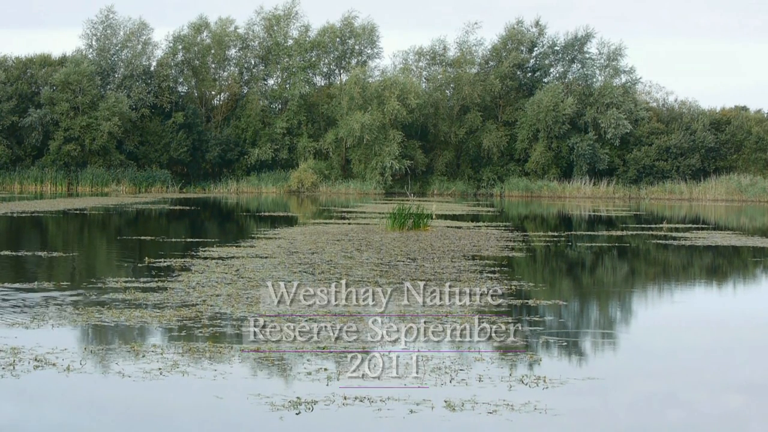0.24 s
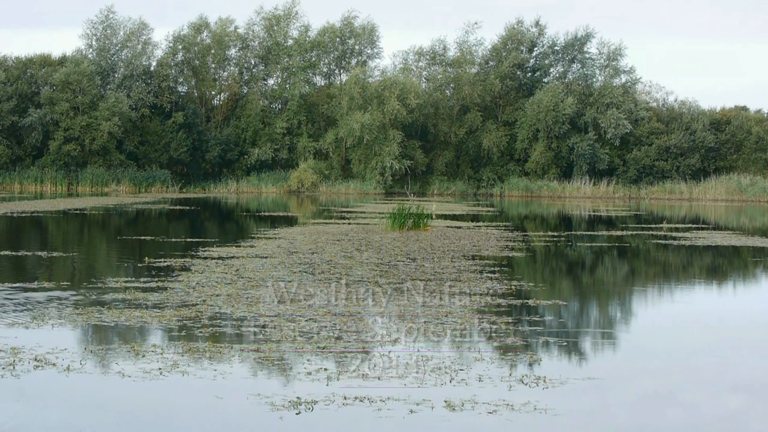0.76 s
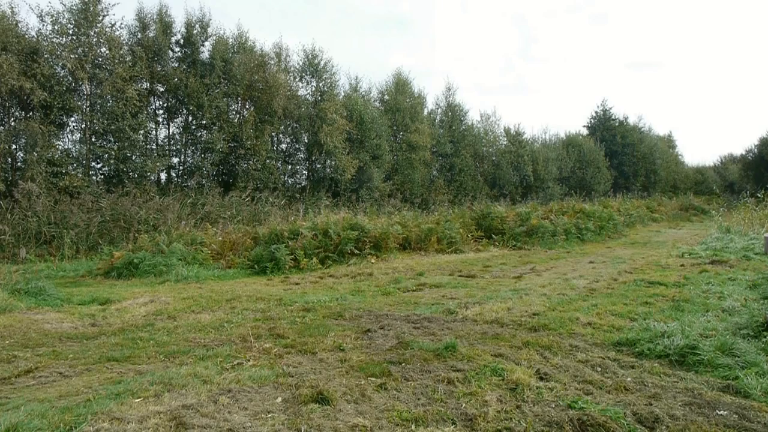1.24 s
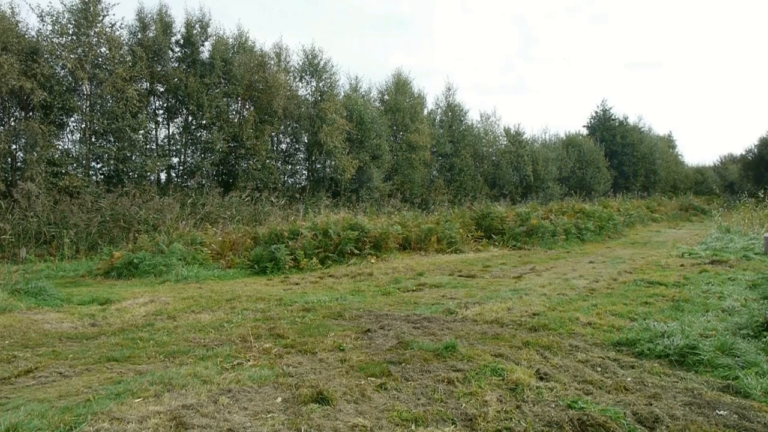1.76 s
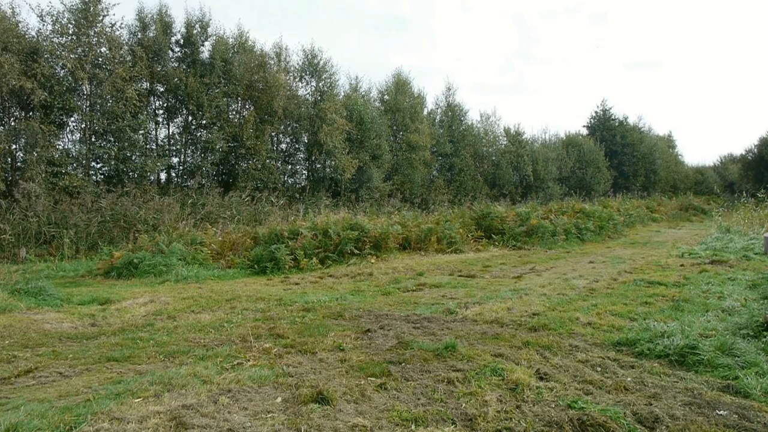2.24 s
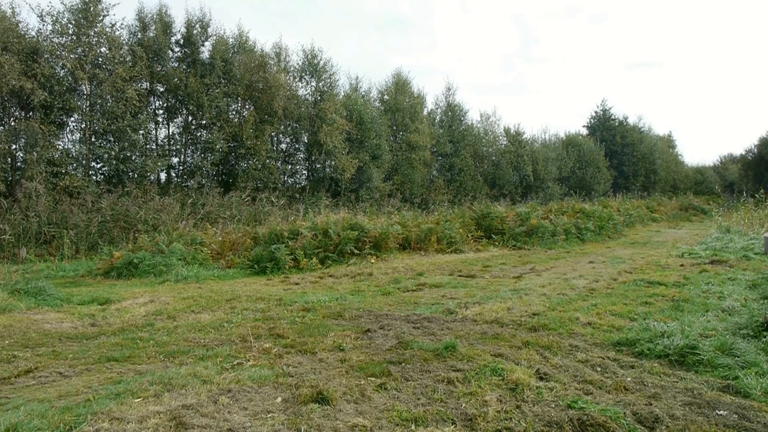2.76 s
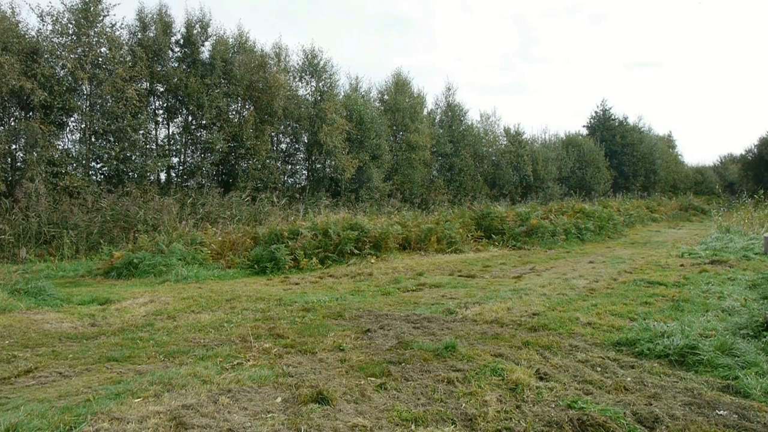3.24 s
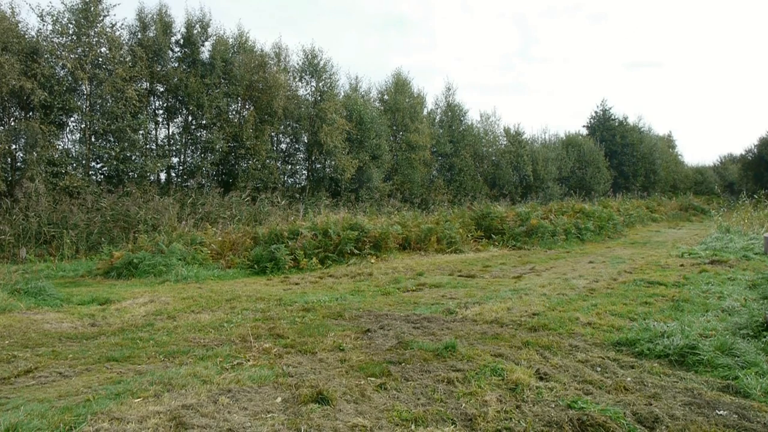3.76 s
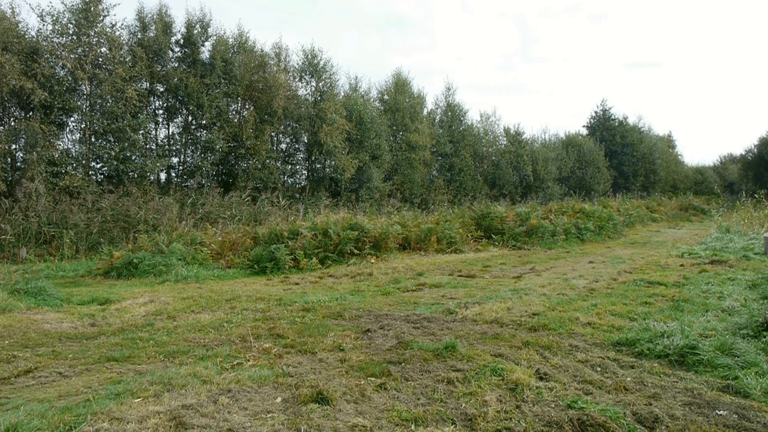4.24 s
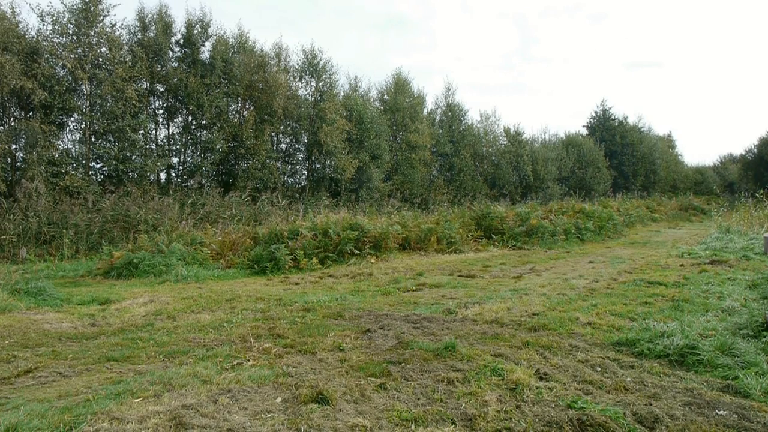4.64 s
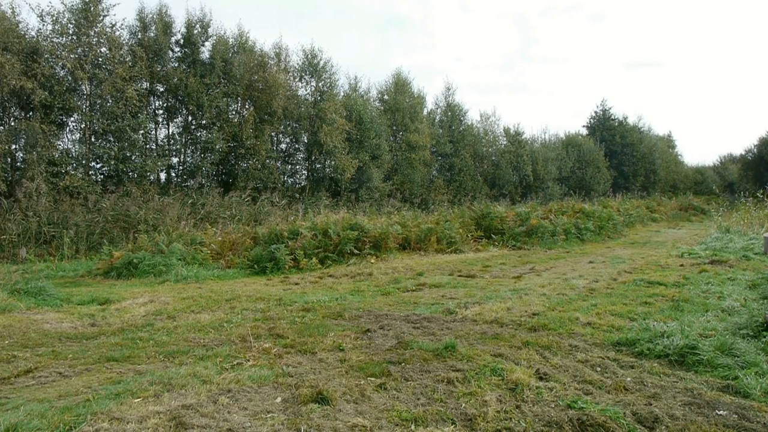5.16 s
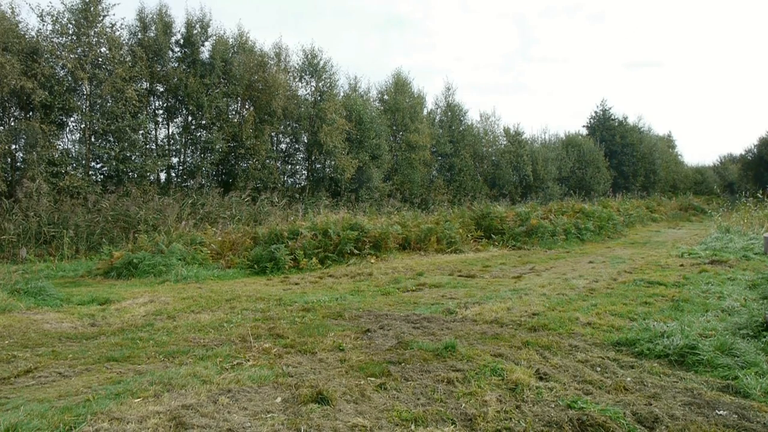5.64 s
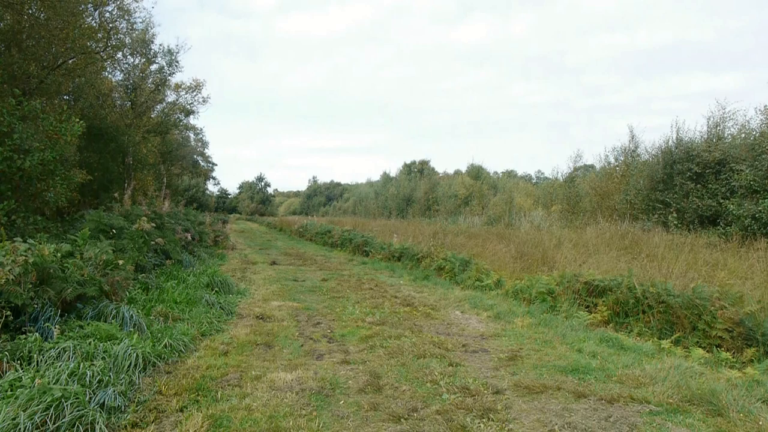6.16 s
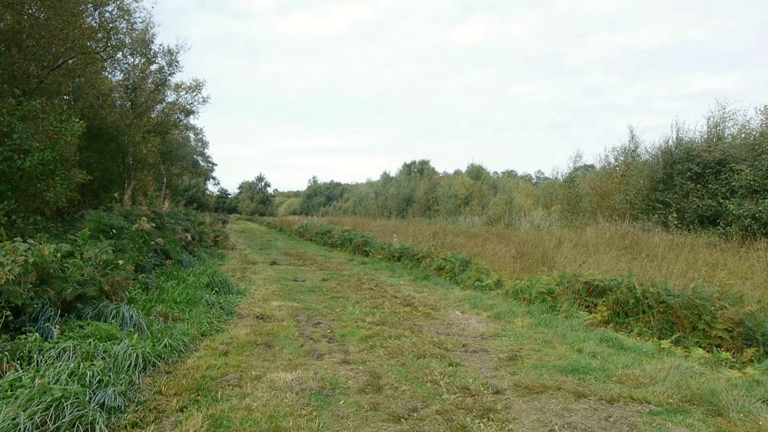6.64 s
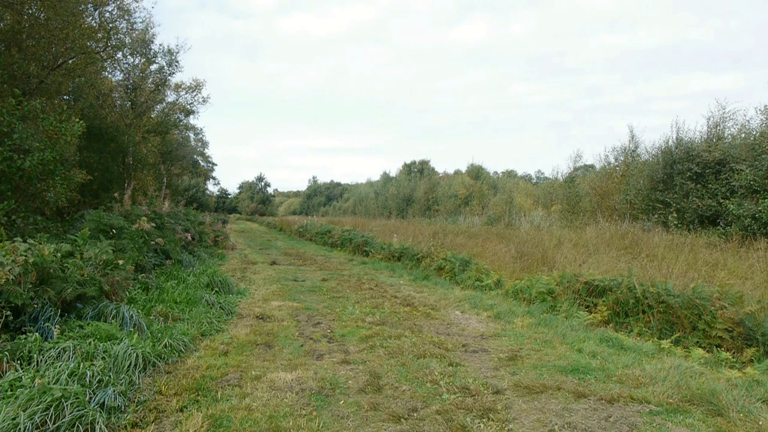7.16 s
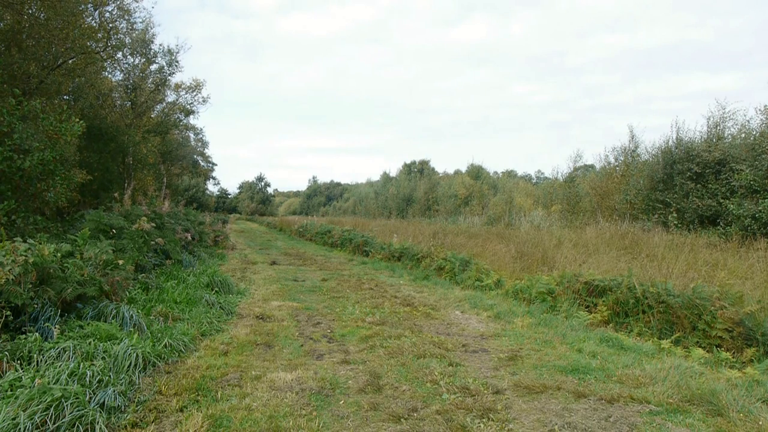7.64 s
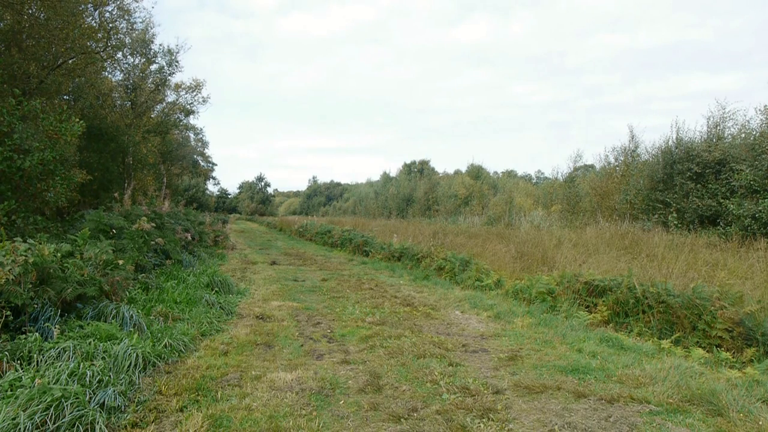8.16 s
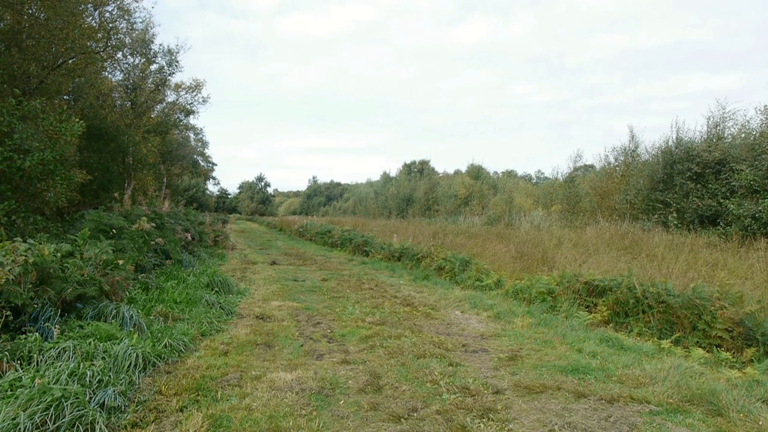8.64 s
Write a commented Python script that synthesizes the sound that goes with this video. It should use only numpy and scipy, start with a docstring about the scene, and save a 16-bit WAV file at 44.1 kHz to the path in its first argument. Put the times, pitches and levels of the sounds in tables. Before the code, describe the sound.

A clear fluty bird whistles close by while others trade scratchy chirps and nasal calls; quiet hiss beneath, distant motor throbbing at the end.

```python
"""At the edge of a wood beside a reed bed, small songbirds sing: one whistles and trills close by, others repeat
harsh chirps and nasal calls, and more sing from deep in the trees. Each voice is a phase-integrated tone with
overtones, following a pitch and level contour; decaying noise echoes stand for scattering by leaves and trunks.
Shaped noise makes a faint steady hiss of air; for the last three seconds low harmonics make a far engine hum."""
import sys
import numpy as np
from scipy import signal
from scipy.fft import rfft, irfft
from scipy.io import wavfile
from scipy.ndimage import uniform_filter1d, map_coordinates

SR = 44100
rng = np.random.default_rng(int(sys.argv[2]) if len(sys.argv) > 2 else 0)


def generate_wav(sig):
    """Save sig (samples, or channels by samples) to the path in sys.argv[1] as 16-bit PCM at SR."""
    pcm = np.round(np.clip(np.atleast_2d(sig).T, -1, 1) * 32767).astype(np.int16)
    wavfile.write(sys.argv[1], SR, pcm)


N = 392931
TIME = np.arange(N) / SR
FREQS = np.fft.rfftfreq(N, 1 / SR)


def undb(db):
    """Level to amplitude ratio: 20 dB is a factor of ten."""
    return 10 ** (np.asarray(db) / 20)


def over_pitch(points):
    """A spectrum through (f/Hz, value) points, interpolated on a logarithmic frequency axis."""
    hz, value = np.transpose(points)
    return np.interp(np.log(FREQS + 1), np.log(hz), value)


def walk(rate, size):
    """Band-limited random fluctuation: normal draws, `rate` per second, joined by a smooth spline."""
    at = np.arange(size) / SR * rate
    draws = rng.standard_normal(int(at[-1]) + 2)
    return map_coordinates(draws, [at], order=2, mode="nearest")


def air():
    """Broadband noise of far foliage; interaural correlation peaks near 300 Hz and is lowest in the treble."""
    # spectrum of the hiss: f/Hz, relative density/dB per Hz
    colour = [(30, -45), (60, -19.5), (92, -22), (144, -8), (200, -5.5), (300, -0.5), (900, -4), (1330, -8),
              (2100, -6), (3300, -8.5), (5200, -15), (9000, -17.5), (15500, -20)]
    # likeness of the two ears: f/Hz, correlation
    ear_likeness = [(100, 0.28), (300, 0.81), (700, 0.53), (2000, 0.37), (8000, .1)]
    mid_level_db = -56.5
    mid, side = rfft(rng.standard_normal((2, N))) * undb(over_pitch(colour))
    likeness = np.clip(over_pitch(ear_likeness), -.9, .99)
    # the ratio of side to mid energy sets the correlation
    side = side * np.sqrt((1 - likeness) / (1 + likeness))
    mid, side = irfft(mid, N), irfft(side, N)
    hiss = np.array([mid + side, mid - side]) / np.std(mid)
    return hiss * undb(mid_level_db + 0.19 * walk(0.64, N))


def engine():
    """Harmonic synthesis: only low multiples of the firing rate carry this far, throbbing and wavering."""
    # harmonics: multiple of the firing rate, level/dB before throb and waver
    harmonics = [(2, -89), (3, -72), (4, -67.5), (5, -63), (6, -67)]
    start_s, firing_hz = 5.81, 27.4
    phase = 2 * np.pi * np.cumsum(firing_hz * (1 + 0.0043 * walk(1.98, N))) / SR
    throb_db = 2.0 * np.cos(2 * np.pi * 1.08 * (TIME - start_s - .14))
    hum = np.zeros(N)
    for multiple, level_db in harmonics:
        waver_db = 1.5 * walk(2.7, N)
        hum += np.sqrt(2) * undb(level_db + throb_db + waver_db) * np.cos(multiple * phase)
    return hum * np.clip((TIME - start_s) / 0.0062, 0, 1)


def in_wood(x, pan_db, lead_ms, leaves_db, wood_db, leaves_t60=0.29, wood_t60=0.97):
    """Scattering: direct sound with level and time differences between ears, then diffuse decaying echoes.

    Positive pan_db and lead_ms favour the left; T60 values are in seconds."""
    t = TIME[:SR]
    sides = np.array([[.5], [-.5]])

    def decay(t60):
        # exponential decay with a brief build-up, scaled to unit energy
        course = np.exp(-np.log(1000) * t / t60) * (1 - np.exp(-t / 0.0023))
        return course / np.linalg.norm(course)

    # nearby leaves scatter briefly and keep the side; far trunks scatter for longer, from all round
    leaves = undb(leaves_db + sides * pan_db) * decay(leaves_t60)
    trunks = undb(wood_db) * decay(wood_t60)
    scatter = np.hypot(leaves, trunks) * rng.standard_normal((2, SR))
    echoes = signal.fftconvolve(x[None], scatter, axes=1)[:, :N]
    # windowed sinc filters delay by a fraction of a sample
    taps = np.arange(-16, 17)
    ports = np.sinc(taps + sides * lead_ms * SR / 1000) * np.hanning(len(taps))
    direct = np.array([np.convolve(x, port, "same") for port in ports])
    return direct * undb(sides * pan_db) + echoes


def sing(notes, overtone_db, rough, flutter_db, rasp_db, trills=()):
    """Frequency modulation in a syrinx: pitch is integrated to phase; uneven vibration adds roughness and rasp."""
    out = np.zeros(N)
    for note in notes:
        s, hz, db = np.transpose(note)
        span = np.flatnonzero((TIME > s.min()) & (TIME < s.max()))
        t, size = TIME[span], len(span)
        if size < 2:
            continue
        pitch = uniform_filter1d(np.interp(t, s, hz), size=200, mode="nearest")
        loud = np.interp(t, s, db) + flutter_db * walk(249, size)
        for start, stop, rate, depth_hz, saw, swing_db in trills:
            # loudness swings along with the pitch sweep; a negative swing opposes it
            turn = 2 * np.pi * rate * (t - start) + .25 * walk(45, size)
            # the trill fades in and out over a quarter of a sweep
            on = np.clip(np.minimum(t - start, stop - t) * rate * 4, 0, 1)
            pitch = pitch + on * depth_hz * (np.sin(turn) - saw * np.sin(2 * turn))
            loud = loud + on * swing_db * (np.sin(turn + 2 * saw) - .5)
        phase = 2 * np.pi * np.cumsum(pitch * (1 + rough * walk(894.0, size))) / SR
        tone = np.sin(phase)
        for k in range(2, 5):
            # harmonics fall 11.5 dB apiece; overtone_db lies midway between the second and third
            gain = undb(overtone_db - 11.5 * (k - 2.5))
            below_nyquist = k * pitch < SR / 2
            tone += gain * np.sin(k * phase) * below_nyquist
        # rasp: the octave, modulated by fast noise
        rasp = undb(rasp_db) * np.sin(2 * phase) * walk(11000, size)
        edges = np.clip(np.minimum(t - t[0], t[-1] - t) / 0.0013, 0, 1)
        out[span] += np.sqrt(2) * undb(loud) * edges * (tone + rasp)
    return out


def slurred(rows, attack_share, swell_db, slew_hz_per_s=14000):
    """Pitch glide with exponential relaxation: a note scoops onto a bowed glide, sags at its end and fades."""
    bow_hz_per_s2, release_share = 4100, 0.039
    bend_db_per_hz = .019  # loudness lost while the note is bent down
    along = np.linspace(0, 1, num=40)

    def bend_course(depth_hz, s):
        # the syrinx retunes at a limited speed, so a deeper bend takes longer
        return depth_hz * np.exp(-s * slew_hz_per_s / (abs(depth_hz) + 1))

    def note(start, length, from_hz, to_hz, level_db, scoop_hz=0, sag_hz=0):
        t = along * length
        bow = bow_hz_per_s2 * (t - length / 2) ** 2
        glide = from_hz + (to_hz - from_hz) * along - bow
        bend = bend_course(scoop_hz, t) + bend_course(sag_hz, length - t)
        envelope = (1 - np.exp(-along / attack_share)) * (1 - np.exp(-(1 - along) / release_share))
        fade_db = 20 * np.log10(np.maximum(envelope, .1))
        bend_loss_db = bend_db_per_hz * np.maximum(bend, 0)
        db = level_db + swell_db * (along - .5) - bend_loss_db + fade_db
        return np.column_stack([start + t, glide - bend, db])

    return [note(*row) for row in rows]


def tiny_bird():
    """Rapid pitch relaxation: two thin, high contact notes hook up from below."""
    # notes: t/s, length/s, glide from f/Hz, to f/Hz, level/dB, scoop/Hz, sag/Hz
    high_notes = [(4.768, .06, 6150, 5840, -48, 790, 0), (4.866, 0.053, 5660, 5680, -53, 395, 0)]
    contours = slurred(high_notes, attack_share=0.045, swell_db=-11, slew_hz_per_s=90000)
    notes = sing(contours, overtone_db=-36, rough=0.018, flutter_db=0.5, rasp_db=-35)
    return in_wood(notes, pan_db=5, lead_ms=0.013, leaves_db=-3, wood_db=-7)


def warbler():
    """Frequency sweeps: fast runs, rising slurs, and nasal calls arched in pitch, coloured by their overtones."""
    # sweeping runs: t/s, length/s, glide from f/Hz, to f/Hz, level/dB, scoop/Hz (negative = from above), sag/Hz
    run_notes = [(.202, .027, 3050, 4200, -33, 0, 0), (.24, .108, 3160, 2550, -32.5, -1050, 0),
                 (4.525, 0.179, 3034, 3070, -34, 8, 0.013)]
    # trilled stretches: from t/s, to t/s, sweep rate/Hz, depth/Hz, sawtooth share, loudness swing/dB
    run_trills = [(.212, .35, 48.4, 514, 0.023, 1.3), (4.525, 4.71, 50.3, 1124, -0.063, 8.8)]
    # rising slurs: t/s, length/s, glide from f/Hz, to f/Hz, level/dB
    slurs = [(.157, .075, 2380, 3710, -46.5), (3.486, .09, 2462, 3593, -65.5)]
    # arched nasal calls: t/s, length/s, top f/Hz, top level/dB, overtone level/dB
    arches = [(0, 0.098, 3584, -43.5, -17.5), (0.21, 0.037, 2990, -43.5, -18),
              (2.14, 0.082, 3330, -41.5, -21), (4.33, 0.044, 2816, -36.5, -13.5),
              (4.389, 0.039, 3413, -36.5, -31), (0.585, 0.041, 6340, -53.5, -35),
              (0.645, 0.016, 6000, -50.5, -30), (1.48, 0.025, 4720, -41.5, -26),
              (1.517, 0.029, 6530, -58, -30), (4.031, .022, 5930, -52.5, -21),
              (6.134, 0.072, 3200, -61, -30), (4.738, 0.033, 7930, -56.5, -30),
              (4.824, 0.034, 7800, -60, -30), (7.429, 0.032, 7770, -54, -28)]
    run_contours = slurred(run_notes, attack_share=.05, swell_db=-3, slew_hz_per_s=50000)
    runs = sing(run_contours, overtone_db=-30, rough=.015, flutter_db=1.5, rasp_db=-27, trills=run_trills)
    slur_contours = slurred(slurs, attack_share=0.075, swell_db=-9)
    calls = sing(slur_contours, overtone_db=-10.5, rough=0.0347, flutter_db=4, rasp_db=-14)
    along = np.linspace(-1, 1, num=9)
    for start, length, top_hz, level_db, overtone_db in arches:
        t = start + length * (along + 1) / 2
        arch = np.column_stack([t, top_hz * (1 - 0.33 * along ** 2), level_db - 9 * along ** 2])
        calls += sing([arch], overtone_db=overtone_db, rough=0.024, flutter_db=3.5, rasp_db=-25.5)
    return (in_wood(runs, pan_db=6, lead_ms=.055, leaves_db=-10, wood_db=-15)
            + in_wood(calls, pan_db=0.0, lead_ms=.007, leaves_db=-1.5, wood_db=-38))


def repeats(shape, calls):
    """Similarity: one call contour is shifted, transposed and stretched for each utterance."""
    return [[(start + s * length, hz * ratio, db + level_db) for s, hz, db in shape]
            for start, level_db, ratio, length, _ in calls]


def lower_side(shape):
    """Two-source voice: the other side of the syrinx sounds lower, softer and 4 ms later before stretching."""
    return [(s + .004, hz * .82, db - 13.5) for s, hz, db in shape]


def scratch(calls):
    """Modulated noise: a crackly hiss swells 50 ms ahead of each chirp, peaks at its start, fades in uneven spurts."""
    # course of the hiss: t/s from the chirp's start, relative level/dB
    scratch_course = [(-.05, -20.5), (-.025, -4), (.01, 2.5), (0.048, -4.5), (.085, -11), (.115, -23)]
    # spectrum of the hiss: f/Hz, relative density/dB per Hz
    scratch_colour = [(1500, -50.5), (2500, -13), (4300, 0), (5100, 5), (5700, -1), (7000, -3.5),
                      (9000, -12.5), (15500, -25)]
    s, db = np.transpose(scratch_course)
    course = np.zeros(N)
    for start, *_, scratch_db in calls:
        course += np.interp(TIME - start, s, undb(db + scratch_db), left=0, right=0)
    spurts_db = 4.5 * walk(1200, N) + 3.5 * walk(120, N)
    grains = rng.standard_normal(N) * undb(spurts_db)
    hiss = irfft(rfft(grains) * undb(over_pitch(scratch_colour)), N)
    return course * hiss / np.std(hiss)


def chirpers():
    """Two-source voices: birds in the bushes trade rough chirps, both sides of the syrinx sounding in the nearer."""
    # contours of the harsh chirp, its softer reply, and a faint, thin tone near 5 kHz that swells
    # for about 40 ms before each harsh chirp:
    # t/s from the start, f/Hz, relative level/dB, before each utterance's stretch, ratio and level
    chirp = [(0, 3190, -15.5), (.012, 4668, 6), (.018, 4924, 7), (.027, 3452, -1.5), (.035, 4447, 5.5),
             (.042, 3722, 1.5), (.058, 3900, 7), (.07, 3294, 3.5), (.085, 2600, -6.5)]
    reply = [(0, 3510, -5), (.013, 4350, 1), (.028, 4450, -3), (.042, 3684, 1.5), (.06, 3600, 3.5),
             (.074, 3213, -3.5), (.09, 2664, -12.5)]
    faint_tone = [(-.04, 5000, -25), (-.022, 4910, -15), (-.002, 4850, -15)]
    # utterances of harsh chirps, replies and chirps from deeper in the wood:
    # t/s, level/dB, pitch ratio, length ratio, scratch level/dB, before the mix gains below
    chirps = [(.449, -36.5, 0.99, 0.97, -44.5), (1.318, -38, 0.97, 1.11, -49),
              (2.513, -37.5, 0.97, 1.09, -48.5), (3.259, -37.5, 0.99, 1.07, -50),
              (3.869, -35, .98, 1.08, -47.5), (4.5, -35.5, 1, 1.01, -45), (5.227, -35, 1.005, 1.06, -45),
              (5.46, -50, .92, 1.06, -60), (6.329, -36, 1.02, 1.03, -43.5), (6.901, -37, 1.06, 1.01, -40),
              (7.186, -53, .85, 0.96, -63), (7.904, -40.5, .95, .9, -44)]
    replies = [(.298, -40, 1.01, 1.05, -58), (.48, -43, 0.9, 0.81, -58), (.943, -45, 1, 1.05, -60.5),
               (0.986, -53.5, 0.74, 0.61, -91), (1.44, -44, 0.9, 0.77, -66), (1.474, -45, .94, 0.91, -60.5),
               (2.63, -47, 0.86, 1.15, -93), (2.729, -44, 0.98, 1.17, -58),
               (3.102, -44, 1.013, 0.93, -59.5), (4.62, -46, 1.11, 0.87, -61),
               (4.665, -42.5, 0.97, 1.09, -63), (5.085, -43.5, 0.92, 1.05, -61),
               (6.388, -40.5, 0.94, 0.92, -56.5), (7.225, -52, 0.97, 0.63, -85),
               (7.962, -40.5, 1.06, 0.61, -64), (8.0, -43.5, 0.94, 0.56, -73),
               (8.889, -39, 0.47, 0.81, -58.5)]
    far_chirps = [(0.738, -77, 0.63, 0.63, -82), (2.931, -54, 0.94, 1, -67), (3.56, -51.5, 0.93, 0.58, -77),
                  (4.048, -50, 0.9, 0.73, -58), (5.029, -50.5, .92, 1, -62),
                  (5.751, -58.5, 0.96, 1.2, -58.5), (6.778, -61, 0.79, 1.3, -77),
                  (7.469, -56.5, 0.93, 0.86, -59), (8.354, -52, 0.93, 1.08, -61.5)]
    upper = sing(repeats(chirp, chirps), overtone_db=-33, rough=.026, flutter_db=3, rasp_db=-30)
    lower = sing(repeats(lower_side(chirp), chirps), overtone_db=-25, rough=.035, flutter_db=3, rasp_db=-30)
    faint = sing(repeats(faint_tone, chirps), overtone_db=-30, rough=.04, flutter_db=2.5, rasp_db=-30)
    reply_contours = repeats(reply, replies) + repeats(lower_side(reply), replies)
    soft = sing(reply_contours, overtone_db=-26, rough=.036, flutter_db=3, rasp_db=-27)
    far = sing(repeats(reply, far_chirps), overtone_db=-43, rough=.08, flutter_db=5.5, rasp_db=-26)
    harsh = faint + upper + lower + scratch(chirps)
    soft = soft + scratch(replies)
    far = far + scratch(far_chirps)
    return (in_wood(harsh, pan_db=-5.5, lead_ms=.07, leaves_db=-6, wood_db=-13)
            + undb(1.0) * in_wood(soft, pan_db=-.5, lead_ms=-.003, leaves_db=-0.5, wood_db=-10.5)
            + undb(-1) * in_wood(far, pan_db=-0.5, lead_ms=.01, leaves_db=1.5, wood_db=1.0))


def whistlers():
    """Direct-to-reverberant ratio: almost pure tones at three distances, the further off the more echo."""
    # notes of the near whistler and of others along the wood's edge:
    # t/s, length/s, glide from f/Hz, to f/Hz, level/dB, scoop/Hz, sag/Hz
    whistles = [(-.03, 0.1284, 1650, 1824, -29.5, 0, 80), (3.5, 0.2, 1873, 1642, -40.5, 522.5, 69),
                (3.775, 0.223, 2168, 2173, -24, 299, 38), (4.04, 0.036, 2560, 2770, -34, 2, 0),
                (4.06, .138, 2510, 2127, -23.5, 0, 2), (4.191, 0.068, 2250, 2243, -23, -2, 1),
                (7.945, 0.19, 2552, 2065, -26, 738.5, 338)]
    answers = [(5.09, .29, 1745, 1743, -47.5, 24, 208), (5.38, 0.18, 1880, 2073, -48, 47, 0),
               (5.47, 0.2, 2050, 2017, -40.5, 218.5, 95), (5.655, .2, 2400, 2479, -45.5, 11, 0),
               (6.05, .16, 2210, 2086, -41.5, 0, 193), (6.465, 0.061, 2260, 2090, -52.5, 0, 0),
               (6.69, 0.058, 2485, 2060, -51.5, 3, 0), (6.91, .06, 2440, 2104, -51, 0, -2)]
    # singers deep in the trees: t/s, length/s, glide from f/Hz, to f/Hz, level/dB before the mix gain below
    distant = [(.96, .07, 2130, 2010, -62), (1.12, .06, 1780, 1610, -71), (1.64, 0.14, 2546, 2456, -68),
               (1.8, 0.18, 2400, 2070, -65), (1.99, 0.14, 2310, 1956, -60.5), (2.1, 0.2, 2030, 2202, -52),
               (2.29, .14, 2255, 2035, -51), (2.3, 0.2, 1832, 1890, -46.5), (2.5, .19, 1796, 1973, -46),
               (2.67, 0.072, 2174, 2153, -47), (5.76, 0.167, 2468, 2530, -53),
               (5.68, 0.047, 1990, 2014, -52), (5.8, 0.14, 2150, 2115, -59.5),
               (5.98, 0.15, 1736, 1830, -55.5), (6.0, 0.17, 2565, 2580, -60.5), (8.7, .13, 1310, 1430, -65)]
    # two near notes that step between registers: t/s, f/Hz, level/dB
    stepped_notes = [
        [(8.235, 1736, -46), (8.255, 1908, -31), (8.293, 2004, -22), (8.319, 2497, -26), (8.331, 2634, -27),
         (8.391, 2630, -21), (8.413, 2390, -21), (8.432, 2188, -32.5)],
        [(8.505, 2077, -40), (8.523, 2156, -26), (8.575, 2192, -20.5), (8.617, 2173, -21), (8.651, 1925, -26),
         (8.673, 1864, -30), (8.725, 1857, -31.5), (8.745, 1790, -40)],
    ]
    # near and deep trills: from t/s, to t/s, sweep rate/Hz, depth/Hz, sawtooth share, loudness swing/dB
    whistle_trills = [(4.0545, 4.197, 55.3, 257, 0.45, 6.5), (7.993, 8.11, 36, 195.6, 0.062, 1),
                      (8.305, 8.387, 100, 141, 0.47, 2)]
    distant_trills = [(1.8, 2.25, 29.8, 89, 0, -2), (2.3, 2.68, 41.4, 84, 0, 3.5),
                      (5.98, 6.12, 45.1, 114, 0, 0.5)]
    near_notes = slurred(whistles, attack_share=0.1, swell_db=-3.0, slew_hz_per_s=17000) + stepped_notes
    near = sing(near_notes, overtone_db=-32.0, rough=0.0038, flutter_db=0.84, rasp_db=-54,
                trills=whistle_trills)
    # the throat lets the octave through only on the lowest notes
    near = signal.sosfilt(signal.butter(10, 3600, fs=SR, output="sos"), near)
    middle_notes = slurred(answers, attack_share=0.15, swell_db=2.5, slew_hz_per_s=12100)
    middle = sing(middle_notes, overtone_db=-52, rough=0.0037, flutter_db=3.0, rasp_db=-28)
    far_notes = slurred(distant, attack_share=.15, swell_db=-3.0)
    far = sing(far_notes, overtone_db=-62.5, rough=0.0095, flutter_db=4.5, rasp_db=-48, trills=distant_trills)
    return (in_wood(near, pan_db=2.5, lead_ms=0.034, leaves_db=-32.5, wood_db=-11.5)
            + in_wood(middle, pan_db=1.5, lead_ms=0.0054, leaves_db=-8.5, wood_db=-3.5)
            + undb(2) * in_wood(far, pan_db=0.0, lead_ms=.01, leaves_db=-0.5, wood_db=-3.0))


def scene():
    """Superposition: the pressures of air, engine and all the birds add."""
    return air() + engine() + tiny_bird() + warbler() + chirpers() + whistlers()


def record(dry):
    """Band limiting: a steep elliptic low-pass cuts the top."""
    top_hz = 15900
    return signal.sosfilt(signal.ellip(10, .1, 80, top_hz, fs=SR, output="sos"), dry)


dry = scene()
out = record(dry)
generate_wav(out)
```